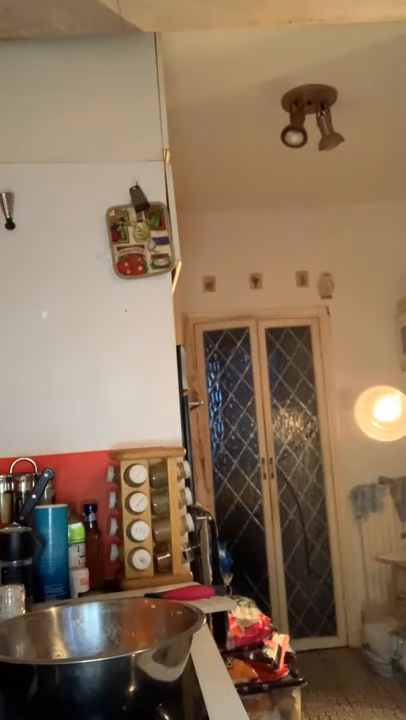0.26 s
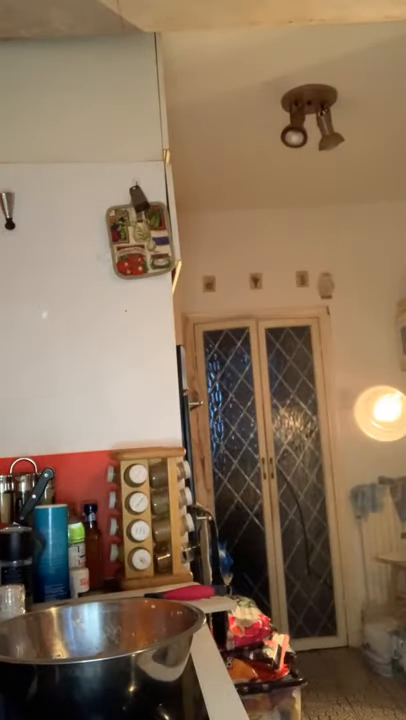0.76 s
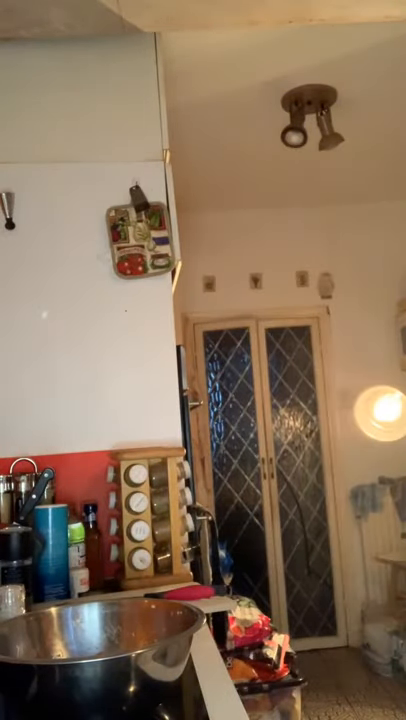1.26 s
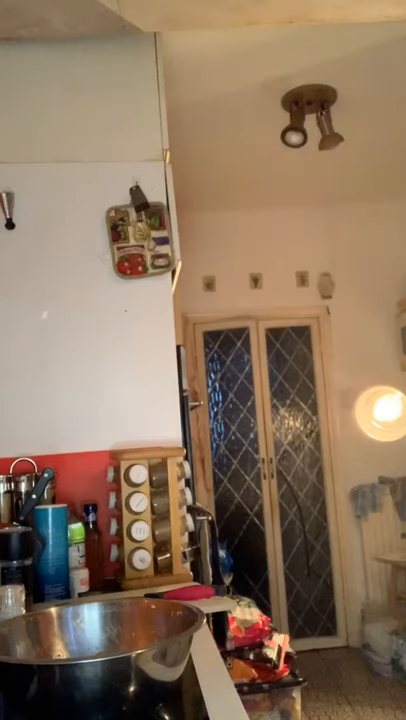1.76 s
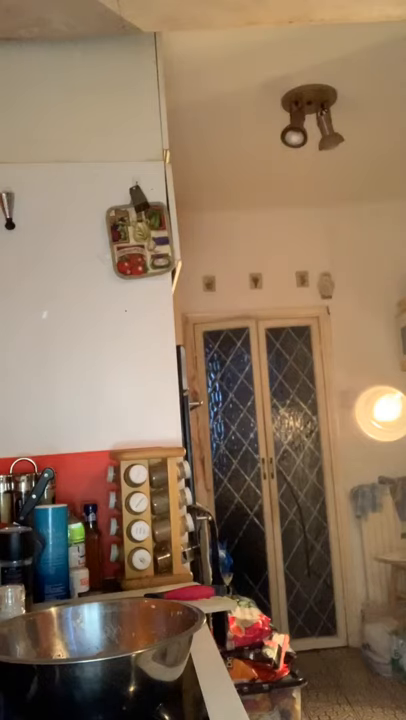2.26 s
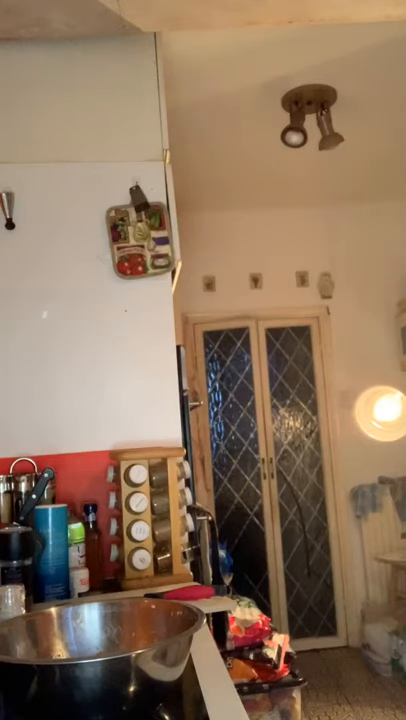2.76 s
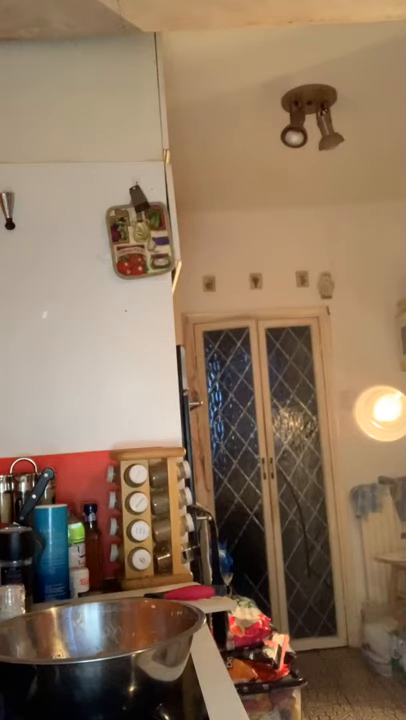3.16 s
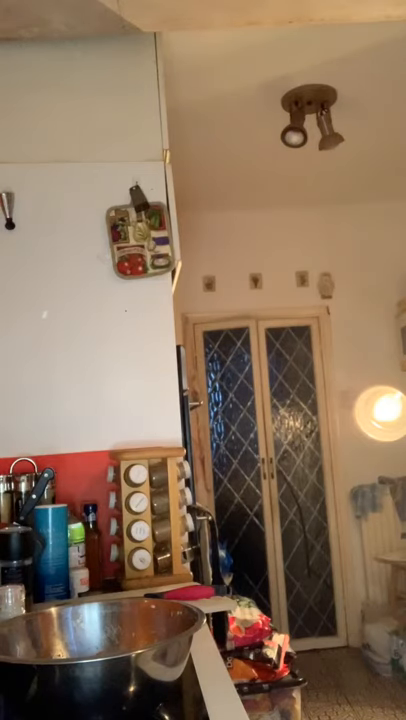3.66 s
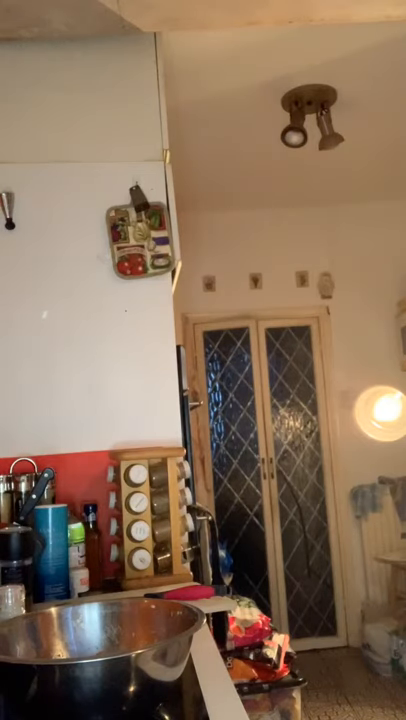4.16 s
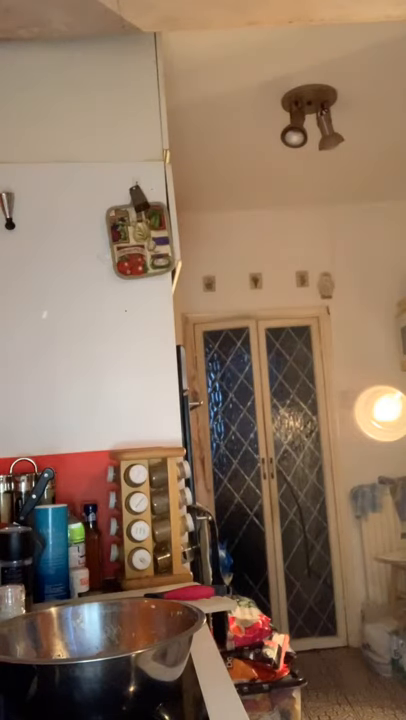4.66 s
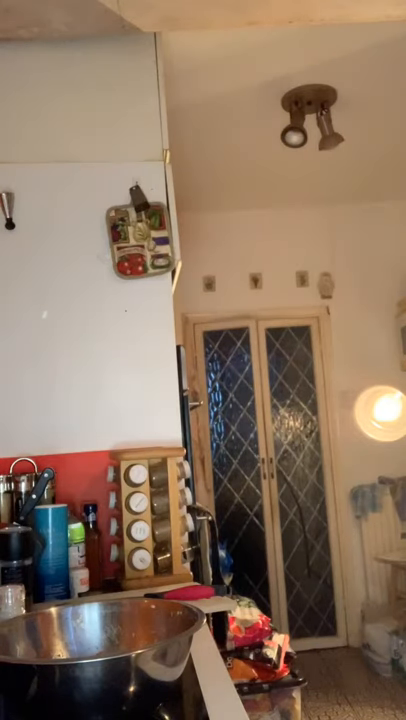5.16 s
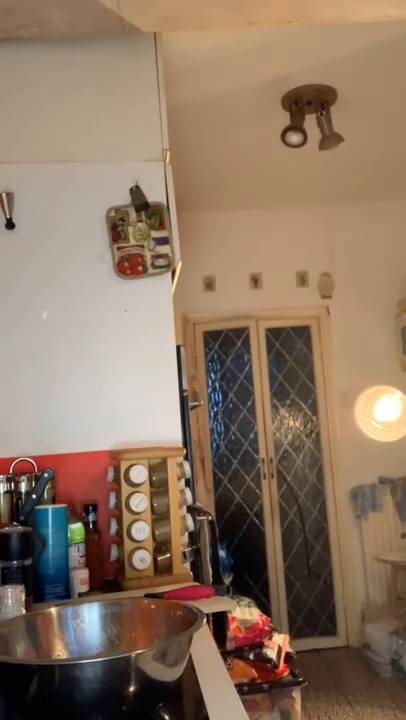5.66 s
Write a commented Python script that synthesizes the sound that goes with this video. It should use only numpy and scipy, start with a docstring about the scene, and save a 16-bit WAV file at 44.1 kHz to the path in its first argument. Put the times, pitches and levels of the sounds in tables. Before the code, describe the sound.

Someone rummages unseen in a kitchen: soft knocks, a sharp catch click, a jangling cutlery drawer, then sparse muffled handling.

```python
"""A hard kitchen where someone searches the cupboard and drawer, heard from the worktop.
Things bump, chatter and rattle as filtered impulses, and a catch snaps; cutlery rings as clusters of
decaying sines. Runners and dragged things rub as random slips, and the cabinet booms in its low modes.
The room answers with decaying random reflections; filtered noise is the air, wavering sines the fridge."""
import sys
import numpy as np
from scipy import signal
from scipy.fft import rfft, irfft
from scipy.io import wavfile
from scipy.ndimage import uniform_filter1d

SR = 44100
rng = np.random.default_rng(int(sys.argv[2]) if len(sys.argv) > 2 else 0)


def output_pcm(signal):
    """Save a mono or channel-first signal as 16-bit PCM at the path in sys.argv[1].

    Samples are clipped to [-1, 1] before scaling.
    """
    pcm = np.clip(np.atleast_2d(signal).T, -1, 1) * 32767
    wavfile.write(sys.argv[1], SR, np.round(pcm).astype(np.int16))


N = 261160
TIME = np.arange(N) / SR

# Event levels are relative: the sources add their own trims.
# things bumping on wood: start_s, clack_db, hollow_body_db, tick_db, main_hz, second_hz, chatter_s
KNOCKS = [(0.0927, -41.5, -46.5, -53.5, 830, 1050, 0.013), (0.208, -50.5, -56, -61, 724, 1680, 0.0062),
          (0.331, -38.5, -54.5, -43, 1660, 1300, 0.0036), (0.657, -43, -43, -51, 630, 1890, 0.0076),
          (0.952, -40.5, -56, -70.5, 1490, 1020, 0.01), (1.194, -34.5, -86.5, -62.5, 1180, 2140, 0.017),
          (1.597, -53.5, -74, -50.5, 2180, 1440, 0.021), (1.63, -43.5, -56, -46, 1610, 2830, 0.016),
          (1.694, -35, -57, -45.5, 960, 1410, 0.0049), (1.724, -29, -59.5, -39, 1250, 2200, 0.0035),
          (1.744, -21, -50.5, -25.5, 2300, 3620, 0.0059), (1.757, -24, -49.5, -25, 910, 1250, 0.0031),
          (1.78, -27.5, -59, -37.5, 1380, 3000, 0.0017), (1.802, -33, -56, -28.5, 860, 1400, 0.0022),
          (1.925, -43.5, -74, -35, 2300, 3440, 0.0015), (2.012, -41, -51, -36.5, 1390, 573, 0.0039),
          (2.114, -37.5, -79, -63, 1830, 1220, 0.0032), (2.222, -38, -55.5, -46, 2080, 1330, 0.013),
          (2.288, -23.5, -47, -33.5, 1020, 1330, 0.0018), (2.309, -29.5, -47, -31, 1350, 2630, 0.0016),
          (2.33, -35, -56, -44, 1560, 3300, 0.001), (2.369, -33.5, -59, -61, 1030, 1540, 0.0027),
          (2.437, -67, -76, -63, 950, 1500, 0.003), (2.586, -47, -65, -53, 2270, 830, 0.0098),
          (2.632, -39.5, -64, -56, 790, 2330, 0.0085), (2.669, -40, -51.5, -44.5, 770, 2340, 0.0061),
          (2.755, -34.5, -60, -48.5, 1460, 2900, 0.007), (2.9, -45, -67, -86, 1520, 990, 0.0023),
          (2.963, -41, -70, -64, 1500, 2420, 0.005), (3.063, -45.5, -65.5, -53.5, 2000, 1290, 0.0067),
          (3.336, -37.5, -59, -38, 1660, 1160, 0.008), (3.569, -48, -58, -51, 1200, 690, 0.01),
          (3.686, -63, -55, -64, 1420, 680, 0.0036), (3.802, -46, -56.5, -72, 1210, 2120, 0.0039),
          (4.072, -47, -52, -75, 790, 1170, 0.027), (4.167, -39, -60, -51.5, 1600, 1850, 0.0015),
          (4.802, -47, -69, -58.5, 1960, 3600, 0.0055), (4.897, -50, -58, -81, 1410, 750, 0.0051),
          (4.955, -39, -56, -62, 1760, 3630, 0.006), (5.09, -45, -49.5, -42.5, 730, 1950, 0.0067),
          (5.44, -64, -62.5, -84.5, 543, 1200, 0.008), (5.493, -60, -76, -85, 1170, 783, 0.0049),
          (5.696, -52.5, -62, -49.5, 855, 1250, 0.013)]
# the cupboard catch letting go: start_s, level_db, chatter_s
CATCH = [(1.2195, -36.5, 0.0021), (1.2273, -21.5, 0.0047), (1.2327, -26, 0.0015), (1.257, -29.5, 0.0013)]
# cutlery colliding: start_s, ring_db, piece
CLINKS = [(1.438, -57.5, "fork"), (1.636, -51, "spoon"), (1.728, -35, "knife"), (1.75, -37, "spoon"),
          (1.789, -35, "ladle"), (1.838, -32.5, "fork"), (1.927, -36.5, "spoon"), (1.94, -35, "spoon"),
          (2.117, -47, "fork"), (2.193, -36, "knife"), (2.293, -37.5, "knife"), (2.321, -37, "teaspoon"),
          (2.405, -38.5, "teaspoon"), (2.484, -45.5, "ladle"), (2.573, -49.5, "teaspoon"),
          (2.669, -49, "spoon"), (3.201, -60, "spoon"), (3.261, -56, "spoon"), (3.337, -47, "ladle"),
          (3.354, -36.5, "ladle"), (3.529, -55, "fork"), (3.649, -61, "spoon"), (3.703, -55, "ladle"),
          (3.781, -53.5, "knife")]
# ringing modes of each piece lying free: pitch_hz, level_db, t60_s
CUTLERY = {"fork": [(7335, -10, .12), (8246, 0, .18), (9665, -10, .12), (13815, -4, .1), (15700, -9, .1)],
           "spoon": [(6585, -12, .12), (7536, 0, .16), (9668, -11, .1), (10048, -3, .16), (15700, -12, .1)],
           "knife": [(8257, -3, .13), (10056, -2, .13), (11574, 0, .12), (11810, -5, .08), (15633, 0, .12)],
           "teaspoon": [(9070, -13, .08), (9560, -9, .08), (9740, 0, .11), (13880, -5, .08),
           (15700, -11, .08)], "ladle": [(7410, -8, .14), (7570, -7, .14), (9657, 0, .14), (14222, -8, .1),
           (15611, -7, .12)]}
# how hard the drawer is worked along its runners: time_s, effort_db
DRAWER = [(1.57, -66.5), (1.74, -41.5), (2.001, -57), (2.38, -48), (2.58, -53), (2.821, -54), (3.25, -55.5),
          (3.55, -60), (3.84, -72), (3.97, -97)]
# things dragged over a shelf or brushed aside: fastest_s, rise_s, scrape_db, hiss_db, tilt_db_per_octave
STROKES = [(0.148, 0.054, -56, -54, -3), (0.225, 0.033, -52, -93, -4.5), (0.363, 0.17, -49.5, -52, -1),
           (0.599, 0.66, -69, -73.5, -0.5), (0.893, 0.091, -46.5, -48.5, 2.5),
           (0.967, 0.068, -51, -64.5, -0.5), (1.226, 0.045, -38.5, -64, 4.5), (1.771, 0.068, -41, -51, 0.5),
           (2.204, 0.097, -62, -51.5, -4), (2.34, 0.1, -42, -66, 8.5), (2.71, 0.19, -50.5, -59.5, 0),
           (3.366, 0.047, -50, -51, 0), (3.759, 0.17, -52.5, -62.5, -0.5), (3.934, 0.064, -54.5, -99, -3),
           (4.195, 0.066, -61, -60.5, -4), (4.29, 0.059, -55, -52.5, 3), (4.967, 0.069, -47, -51.5, 3),
           (5.195, 0.14, -53.5, -54.5, -2), (5.488, 0.047, -67, -80.5, -5.5),
           (5.638, 0.05, -60.5, -67, 5.5), (5.741, 0.1, -62, -62.5, -4)]
# heavy jolts to the cabinet: start_s, boom_db, shudder_db, shove_s
JOLTS = [(0.226, -68, -38.5, 0.013), (0.793, -74.5, -45.5, 0.033), (1.24, -36.5, -44.5, 0.077),
         (1.743, -32.5, -52, 0.24), (2.299, -47, -49, 0.044), (2.695, -42, -36.5, 0.038),
         (3.349, -73, -51.5, 0.061), (4.092, -65.5, -47.5, 0.043), (5.099, -55, -40.5, 0.13)]
# low panel modes of the cabinet carcass: pitch_hz, level_db, t60_s
CARCASS = [(61.9, 1, 0.67), (74.4, -1.5, 0.3), (121.2, -3, 0.87), (219.4, -1.5, 0.18), (263, -18.5, 0.1)]
# small dry clicks close by: start_s, level_db
CLICKS = [(0.093, -51), (0.3288, -25.5), (0.573, -65), (2.4845, -49), (3.533, -44.5), (3.7824, -39.5),
          (4.805, -74), (5.6303, -54), (5.656, -44)]

# smooth colour of an object's clack: freq_hz, level_db
CLACK_COLOUR = [(100, -38), (480, -0.5), (850, 3), (1400, 4.5), (2200, -1.5), (3400, 4.5), (5000, -1.5),
                (9000, -10), (16000, -86)]
# colour of the hollow cabinet body: freq_hz, level_db
BODY_COLOUR = [(40, -35.5), (130, 2), (175, -6), (230, -8.5), (340, -1), (430, 0), (530, 2.5), (660, 0),
               (900, -12), (1500, -44), (5000, -34.5)]
# colour of the hard, bright tick: freq_hz, level_db
TICK_COLOUR = [(500, -52.5), (2500, -12.5), (4500, -2), (7000, 7.5), (10000, 6.5), (12500, 6),
               (16000, 10.5)]
# colour of the catch: freq_hz, level_db
SNAP_COLOUR = [(60, -19), (130, -22), (180, -34), (260, -16.5), (480, -12.5), (900, -5), (1400, -5),
               (1700, 3.5), (2050, 1.5), (2400, -6.5), (3000, -2), (4000, -3), (7000, -10.5), (9500, -11),
               (11500, -27.5), (16000, -27.5)]
# colour of coarse scraping before any tilt: freq_hz, level_db
SCRAPE_COLOUR = [(60, -21), (220, -17.5), (450, -4), (900, -0.5), (1600, 3.5), (2300, -4), (3600, 6.5),
                 (4600, -8), (6500, -27), (12000, -36)]
# colour of fine hissing friction: freq_hz, level_db
HISS_COLOUR = [(800, -18), (3000, -35), (5000, 7.5), (9500, 6.5), (12000, -4.5), (16000, -1.5)]
# colour of the cabinet's rumble: freq_hz, level_db
RUMBLE_COLOUR = [(20, -47), (32, -3.5), (50, 2), (80, 2), (105, -7.5), (145, -8.5), (175, -25.5),
                 (260, -24.5), (600, -29), (2000, -89)]
# colour of the near clicks: freq_hz, level_db
CLICK_COLOUR = [(500, -45), (2500, -7.5), (4500, 6), (8000, -6.5), (12000, 2.5), (16000, 8)]
# panel resonances standing out of every colour above: pitch_hz, width_hz, lift_db
PANELS = [(132.3, 7.1, 19.5), (211.6, 50, 11.5), (322, 180, 9.5), (930, 70, -0.5), (2120, 840, 7.5)]
# hollow resonances of the doors: pitch_hz, width_hz, lift_db
DOOR = [(248, 99, 4.5), (345, 60, 3.5), (640, 150, 5.5)]

# decay time of the room: freq_hz, t60_s
ROOM_T60 = [(100, 0.321), (500, 0.39), (1500, 0.33), (4000, 0.4), (9000, 0.34), (16000, 0.39)]
# colour of the room air: freq_hz, level_db
AIR_COLOUR = [(20, -15), (48, 7), (90, 1), (200, -6.5), (450, -19.5), (760, -13.5), (900, -22),
              (1600, -19.5), (4000, -22.5), (15000, -33.5)]
# fridge hum before its flutter: pitch_hz, level_db
FRIDGE = [(50, -93), (199, -85), (786, -81)]
# side over mid, before the delayed crossing combs both: freq_hz, level_db
WIDTH = [(60, 0.5), (200, 14.5), (450, 13.5), (800, 12), (1400, 2.5), (2400, 2.5), (5000, 0), (16000, 2)]
# how alike side and mid are: freq_hz, correlation
LIKENESS = [(100, 0.73), (700, 0.23), (1500, .5), (3000, 0.17), (7000, 0.65), (16000, 0.46)]

STOP_SHARE = 0.55  # a stroke slows down in this share of its rise time
SHUDDER_RISE_S, SHUDDER_SHARE = 0.027, 0.6  # build-up; decay time as a share of the shove
GRIP_SHARE = 0.68  # lying in a heap, cutlery rings for this share of its free time
SETTLE_S = 0.027  # decay time of the stir after a cutlery collision
REACH_S = 0.17  # the hands move on to another spot in this time
PORT_LAG = 5  # samples by which each side reaches the other late
EDGE_HZ = 15950  # upper band limit


def knocks(clack_db=23, body_db=30, tick_db=28, width=0.22, lift_db=8, second_width=0.64, second_lift_db=7):
    """A blow pushes the hollow cabinet once; the object chatters at its damped resonances, ticks and rattles."""
    clack, body, tick = np.zeros((3, N))
    for s, clack_level, body_level, tick_level, hz, second_hz, chatter in KNOCKS:
        force = contact(chatter, first=1.0)
        # widths are shares of each resonance's pitch
        own = [(hz, width * hz, lift_db), (second_hz, second_width * second_hz, second_lift_db)]
        clack_gain = amp(clack_level + clack_db)
        add(clack, s, clack_gain * ring(force, CLACK_COLOUR, own + some_object()))
        add(clack, s, clack_gain * rattle())
        add(body, s, amp([body_level + body_db]))  # a single-sample push
        add(tick, s, amp(tick_level + tick_db) * force)
    return clack + ring(body, BODY_COLOUR, DOOR) + ring(tick, TICK_COLOUR)


def rattle(loss_db=-7, gap_s=0.016, count=2):
    """A struck object lands again at uneven gaps, each time weaker and on an edge with other resonances."""
    out = np.zeros(SR // 4)
    landings = np.cumsum(gap_s * (.5 + rng.random(count)))
    for k, s in enumerate(landings):
        add(out, s, amp(loss_db * (k + 2)) * ring([1.], CLACK_COLOUR, some_object()))
    return out


def some_object(count=7):
    """Each tin, jar or box has short resonances of its own over two and a half octaves, as pitch, width, lift."""
    octave_share = (np.arange(count) + rng.random(count)) / count
    return [(hz, 25 + hz / 36, 8) for hz in 600 * 6 ** octave_share]


def catch(level_db=28):
    """The catch slips, then snaps: bursts of contact sound its colour and the panels."""
    force = np.zeros(N)
    for s, db, chatter in CATCH:
        add(force, s, amp(db + level_db) * contact(chatter, first=0.23))
    return ring(force, SNAP_COLOUR)


def cutlery(ring_db=30, tick_db=26, chatter=0.017):
    """Steel pieces collide with a hard tick and ring in their own modes."""
    rings, ticks = np.zeros((2, N))
    for s, db, piece in CLINKS:
        add(rings, s, amp(db + ring_db) * steel(piece, spread=.006))
        add(ticks, s, amp(db + tick_db) * contact(chatter))
    return rings + ring(ticks, TICK_COLOUR)


def steel(piece, spread, strike_db=4, count=3):
    """One piece's ring, energy 1: close modes shift with how it lies; the spot struck sets their strength."""
    t = np.arange(SR // 4) / SR
    hz, mode_db, t60 = np.transpose(CUTLERY[piece] * count)[:, :, None]
    shift, phase, spot = rng.standard_normal((3, len(hz), 1))
    decay = amp(mode_db + strike_db * spot - 60 * t / (GRIP_SHARE * t60))
    modes = decay * np.sin(2 * np.pi * (hz * (1 + spread * shift) * t + phase))
    tone = modes.sum(0)
    return tone / np.linalg.norm(tone)


def jiggle(ring_db=-25, tick_db=-12, per_s=14, count=3):
    """Many unlike pieces in the drawer keep tapping their neighbours at random while the heap is stirred."""
    pieces, motion = list(CUTLERY) * count, unrest()
    taps = [slips(per_s, 0.736, 0) * motion for _ in pieces]
    rings = np.zeros(N)
    for force, piece in zip(taps, pieces):
        rings += signal.oaconvolve(force, steel(piece, spread=.04))[:N]
    return amp(ring_db) * rings + amp(tick_db) * ring(sum(taps), TICK_COLOUR)


def unrest(clink_db=-2, drawer_db=-14):
    """How much loose cutlery moves: the drawer rocks it, and each collision stirs it for a moment."""
    t = np.arange(SR // 2) / SR
    power = (amp(drawer_db) * drawer_effort()) ** 2
    for s, db, _ in CLINKS:
        add(power, s, (amp(db + clink_db) * np.exp(-t / SETTLE_S)) ** 2)
    return np.sqrt(power)


def rummaging(clack_db=-13, body_db=-19, per_s=5, count=5):
    """A few loose things in the moving drawer nudge each other and its sides at random."""
    effort = drawer_effort()
    nudges = [slips(per_s, 2.5, 0) * effort for _ in range(count)]
    clack = sum(ring(force, CLACK_COLOUR, some_object()) for force in nudges)
    return amp(clack_db) * clack + amp(body_db) * ring(sum(nudges), BODY_COLOUR)


def drawer_effort():
    """The push on the drawer as a gain for every sample; zero before its first point and after its last."""
    s, db = np.transpose(DRAWER)
    return amp(np.interp(TIME, s, db)) * (TIME > s[0]) * (TIME < s[-1])


def sliding(scrape_db=0, hiss_db=1, runner_scrape_db=-20, runner_hiss_db=-19, grip_db=1.5):
    """The drawer's runners and each stroke rub: coarse slips sound the dragged object, fine ones hiss."""
    coarse = slips(170, 3.5, 0.3)
    fine = slips(760, 7.3, 0.74)
    # the grip comes and goes, so the coarse slips swell and fade
    coarse = unit(coarse * amp(grip_db * wobble(size=700)))
    effort = drawer_effort()
    scrape = amp(runner_scrape_db) * ring(effort * coarse, SCRAPE_COLOUR, some_object())
    hiss = amp(runner_hiss_db) * effort * fine
    for s, rise, scrape_level, hiss_level, tilt_db in STROKES:
        speed = stroke_speed(s, rise)
        moving = speed > 0
        rub = drag(coarse[moving], speed[moving], tilt_db)
        add(scrape, TIME[moving][0], amp(scrape_level + scrape_db) * rub)
        hiss += amp(hiss_level + hiss_db) * speed * fine
    return scrape + ring(hiss, HISS_COLOUR)


def stroke_speed(s, rise):
    """A hand speeds up until time s and slows down more quickly; the peak speed is 1."""
    t = TIME - s
    reach = t / np.where(t < 0, rise, rise * STOP_SHARE)
    return np.exp(-2 * np.minimum(reach ** 2, 20)) * (abs(reach) < 2)


def drag(force, speed, tilt_db, glide=0.16):
    """A dragged object's resonances rise and sink with its speed as the contact shifts."""
    colour = [(hz, db + tilt_db * np.log2(hz)) for hz, db in SCRAPE_COLOUR]
    rub = ring(force, colour, some_object())
    position = np.cumsum(1 + glide * (speed - 1))  # varispeed read-out, in samples
    return speed * np.interp(position, np.arange(len(rub)), rub)


def slips(per_s, spread_db, smooth):
    """Friction or random taps: sparse slips of uneven size over an even rub (smooth 0: none), rms 1."""
    size = amp(spread_db * np.minimum(rng.exponential(1, N), 4)) * rng.choice([-1, 1], N)
    sparse = unit(size * (rng.random(N) < per_s / SR))
    return unit(sparse + smooth * rng.standard_normal(N))


def cabinet(level_db=-1):
    """The carcass booms: low coloured noise, levelled and then driven by how much it is shaken."""
    boom = ring(rng.standard_normal(N), RUMBLE_COLOUR)
    boom /= np.sqrt(uniform_filter1d(boom ** 2, size=3000) + 1e-9)
    return amp(level_db) * boom * shaking()


def shaking(drawer_db=0, stroke_db=-8, knock_db=-8, knock_s=0.12):
    """How much the cabinet shakes: the drawer, dragged things, knocks and jolts add their power."""
    t = np.arange(SR) / SR
    power = (amp(drawer_db) * drawer_effort()) ** 2
    for s, rise, scrape_level, *_ in STROKES:
        power += (amp(scrape_level + stroke_db) * stroke_speed(s, rise)) ** 2
    swell = 1 - np.exp(-t / SHUDDER_RISE_S)
    for s, _, body_level, *_ in KNOCKS:
        add(power, s, (amp(body_level + knock_db) * swell * np.exp(-t / knock_s)) ** 2)
    for s, _, level, shove in JOLTS:
        # the shudder holds for the shove, then dies away
        release = np.exp(-np.maximum(t - shove, 0) / (SHUDDER_SHARE * shove))
        add(power, s, (amp(level) * swell * release) ** 2)
    return np.sqrt(power)


def jolts(swell_s=0.029):
    """A jolt swells into the low modes of the carcass, which then die away."""
    out, t = np.zeros(N), np.arange(SR) / SR
    for s, level, _, _ in JOLTS:
        boom = np.zeros(SR)
        for hz, db, t60 in CARCASS:
            boom += amp(level + db - 60 * t / t60) * np.sin(2 * np.pi * (hz * t + rng.random()))
        add(out, s, boom * (1 - np.exp(-t / swell_s)))
    return out


def clicks(level_db=19, chatter=0.0012):
    """Very short bright clicks, each one touch with a little chatter."""
    force = np.zeros(N)
    for s, db in CLICKS:
        add(force, s, amp(db + level_db) * contact(chatter, first=1.0))
    return ring(force, CLICK_COLOUR)


def contact(chatter, first=1.8, per_s=2500, size=4096):
    """One touch, then the chatter of small random bounces that swells and dies after it, with energy 1."""
    t = np.arange(size) / SR
    force = rng.standard_normal(size) * (rng.random(size) < per_s / SR)
    force *= (1 - np.exp(-t / .0012)) * np.exp(-t / max(chatter, 1e-4))
    force[0] = first / 2
    return force / np.linalg.norm(force)


def ring(force, colour, own=(), size=8192):
    """A force drives a causal filter of energy 1: smooth colour, panel resonances and the object's own."""
    hz = abs(np.fft.fftfreq(size, 1 / SR))
    db = read(colour, hz)
    for f, width, lift in [*PANELS, *own]:
        db = db + lift / (1 + (2 * (hz - f) / width) ** 2)
    # minimum phase: the Hilbert transform of the log gain sets the phase
    spectrum = np.exp(np.conj(signal.hilbert(np.log(amp(db)))))
    taps = np.fft.ifft(spectrum).real[:size // 2]
    return signal.oaconvolve(force, taps / np.linalg.norm(taps))[:N]


def kitchen(x, direct_db=-8, early_db=3, early_s=0.04, per_s=5000, count=4):
    """Weak direct sound, strong early and dense late reflections in mid and side, shifting as the hands move."""
    t = np.arange(SR * 2 // 3) / SR
    out = amp(direct_db) * x * np.array([[1], [0]])
    for spot in range(count):
        taps = rng.choice([-1., 1.], (2, len(t))) * (rng.random((2, len(t))) < per_s / SR)
        hz, frame_s, z = signal.stft(taps, SR, nperseg=256)
        decay = amp(-60 * frame_s / read(ROOM_T60, hz)[:, None])
        tail = signal.istft(z * decay, SR)[1][:, :len(t)]
        tail *= amp(early_db * np.exp(-t / early_s))
        tail /= np.linalg.norm(tail, axis=1, keepdims=True)
        # crossfade round the spots in turn, one every REACH_S
        away = abs((TIME / REACH_S - spot) % count - count / 2)
        here = x * np.cos(np.pi / 2 * np.minimum(away, 1))
        out += signal.fftconvolve(here[None], tail, axes=1)[:, :N]
    return out


def ports(field):
    """A stereo pair: each side is crossed with the other a few samples late, which combs mid and side."""
    hz = np.fft.rfftfreq(N, 1 / SR)
    front, across = rfft(field)
    late = np.exp(-2j * np.pi * hz * PORT_LAG / SR)
    like = np.clip(read(LIKENESS, hz), -1, 1)
    mid = front * (late + 1) / 2
    blend = like * front + np.sqrt(1 - like ** 2) * across
    side = blend * (late - 1) / 2 * amp(read(WIDTH, hz))
    return irfft(np.array([mid + side, mid - side]), N)


def background(air_db=-69.5, waver=0.003, swell_db=2.7, hum_flutter_db=3.0):
    """Room air whose bass and upper part swell separately; the fridge hum wavers in pitch and level."""
    f = np.fft.rfftfreq(N, 1 / SR)
    colour = amp(read(AIR_COLOUR, f))
    air = np.array([unit(irfft(rfft(rng.standard_normal(N)) * colour, N)) for _ in range(2)])
    bass = irfft(rfft(air) / (1 + (f / 150) ** 4), N)
    air = sum(amp(air_db + swell_db * wobble(size=4000)) * part for part in (bass, air - bass))
    bent_time = TIME + waver * np.cumsum(wobble(size=2000)) / SR
    hum = np.zeros(N)
    for hz, db in FRIDGE:
        level = amp(db + hum_flutter_db * wobble(size=1500)) * np.sqrt(2)
        hum += level * np.sin(2 * np.pi * (hz * bent_time + rng.random()))
    return air + hum * np.array([[1], [.4]])


def wobble(size):
    """Slow random drift of rms 1 that changes over about size samples."""
    return unit(uniform_filter1d(uniform_filter1d(rng.standard_normal(N), size), size))


def amp(db):
    """Decibels to gain."""
    return 10 ** (np.asarray(db) / 20)


def unit(x):
    """Scales to rms 1."""
    return x / np.sqrt(np.mean(x ** 2) + 1e-20)


def read(points, hz):
    """Reads a table on a log-frequency axis."""
    f, value = np.transpose(points)
    return np.interp(np.log(hz + 1), np.log(f + 1), value)


def add(mix, s, sound):
    """Mixes a sound in at time s."""
    part = mix[max(round(s * SR), 0):][:len(sound)]
    part += sound[:len(part)]


def scene(click_room_db=-6):
    """Handling sounds cross the room; near clicks and the boom carried by the worktop arrive directly."""
    near = clicks()
    handling = knocks() + catch() + cutlery() + jiggle() + rummaging() + sliding()
    field = kitchen(handling + amp(click_room_db) * near) + background()
    direct = near + cabinet() + jolts()
    return ports(field + direct * np.array([[1], [0]]))  # direct sound enters the front channel only


def record(dry):
    """A steep low-pass takes off the extreme treble."""
    lowpass = signal.firwin(511, EDGE_HZ, window=("kaiser", 9), fs=SR)
    return signal.oaconvolve(dry, lowpass[None], "same")


dry = scene()
out = record(dry)
output_pcm(out)
```